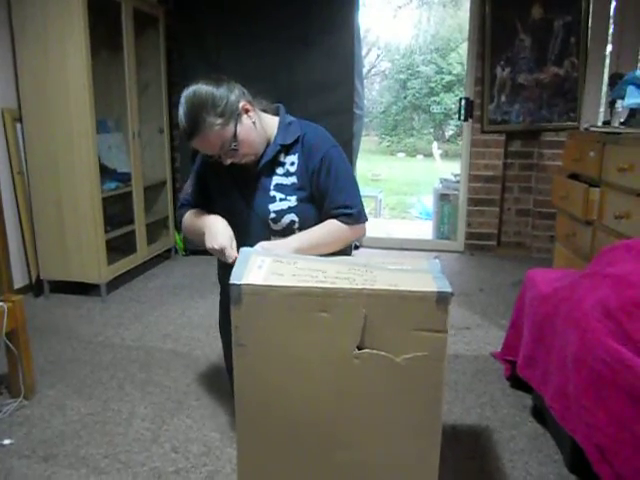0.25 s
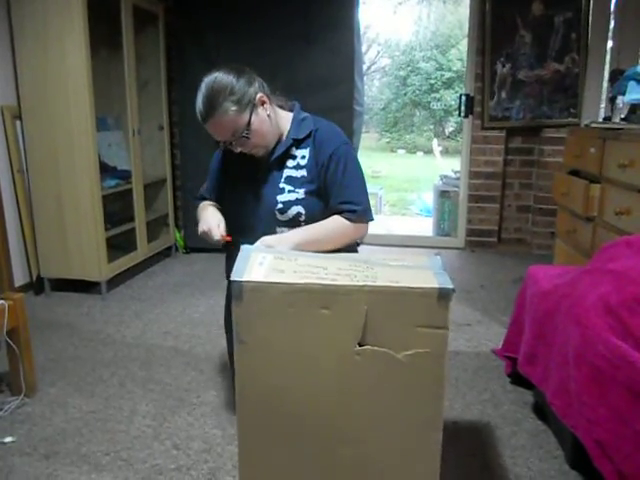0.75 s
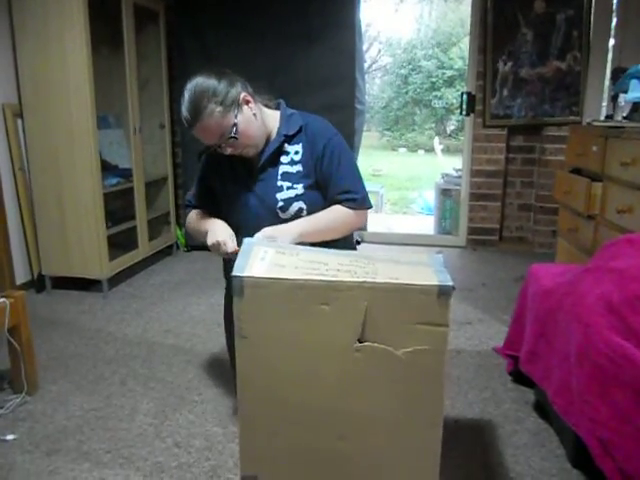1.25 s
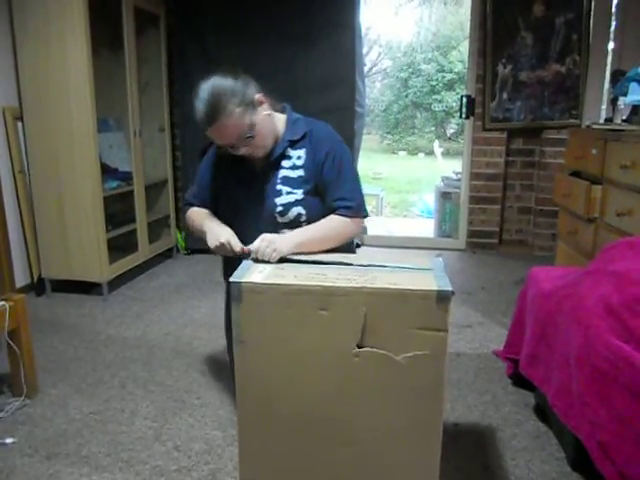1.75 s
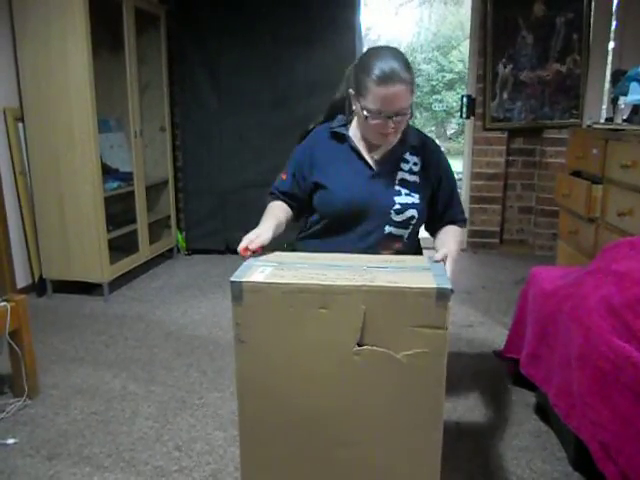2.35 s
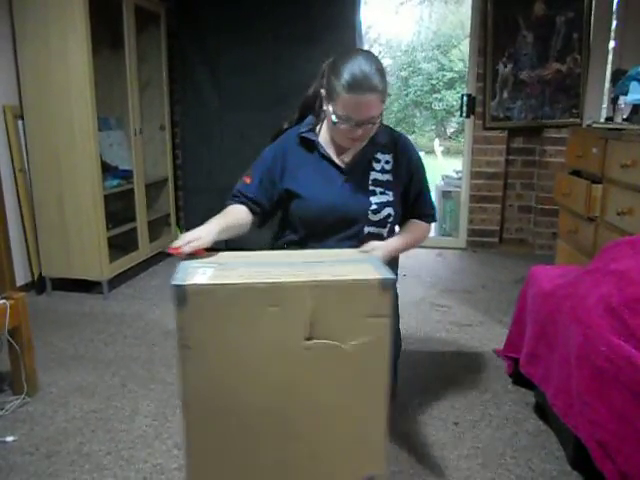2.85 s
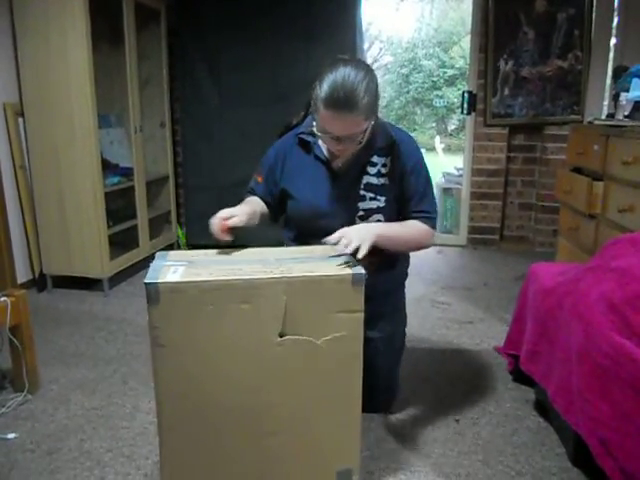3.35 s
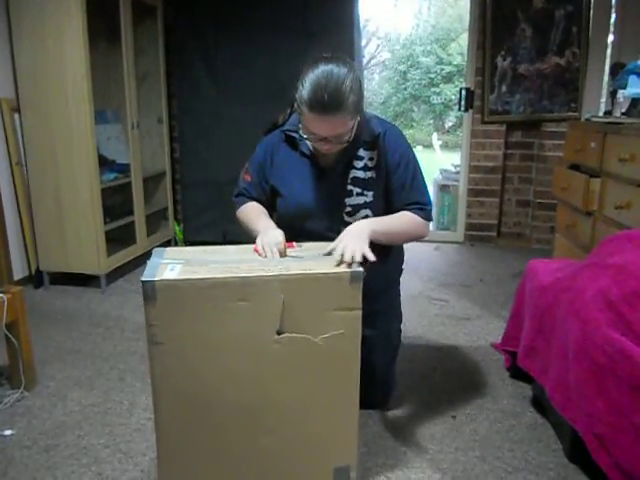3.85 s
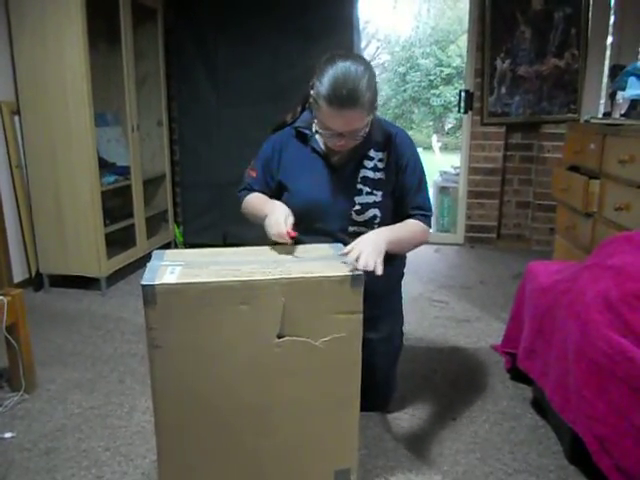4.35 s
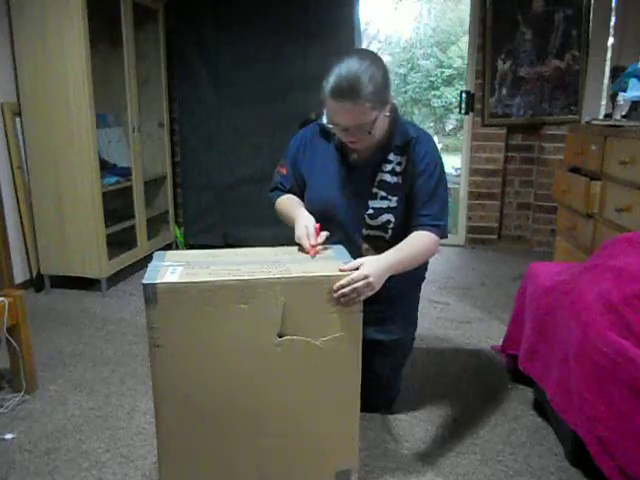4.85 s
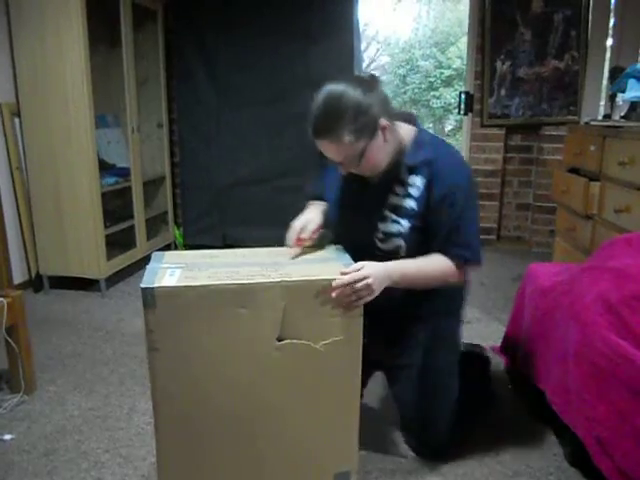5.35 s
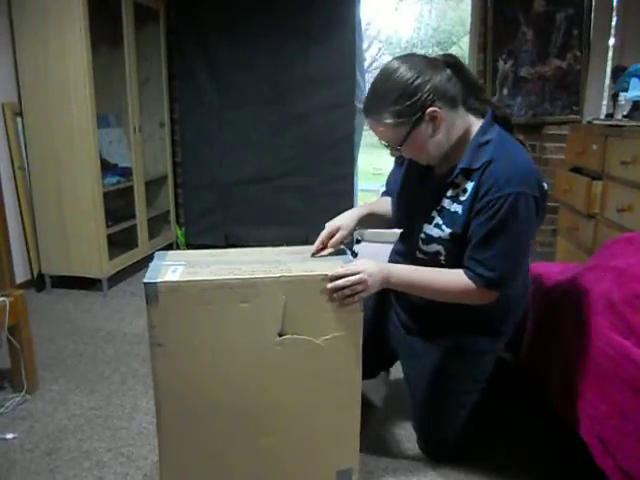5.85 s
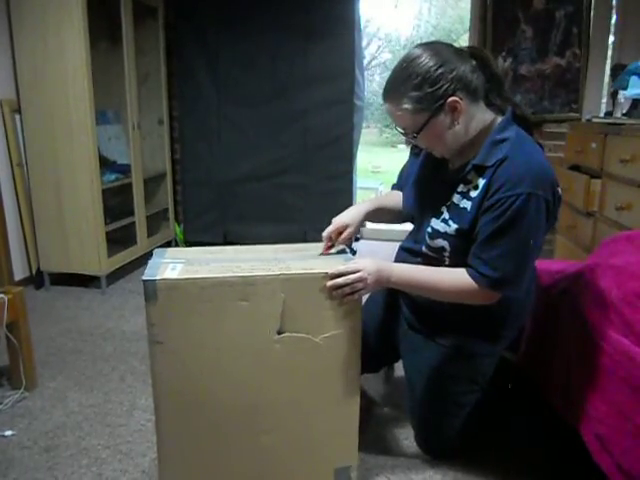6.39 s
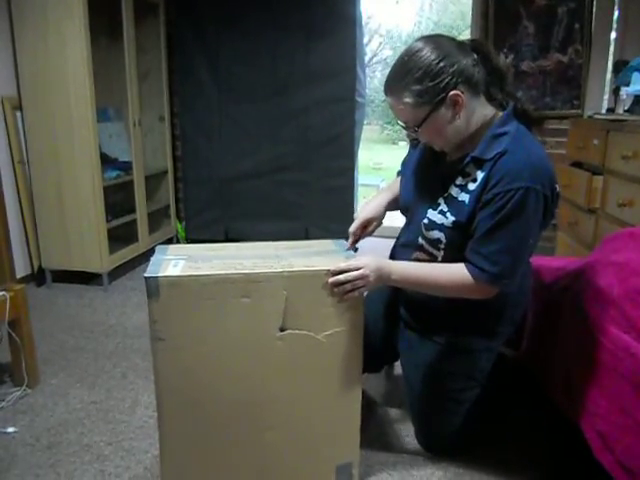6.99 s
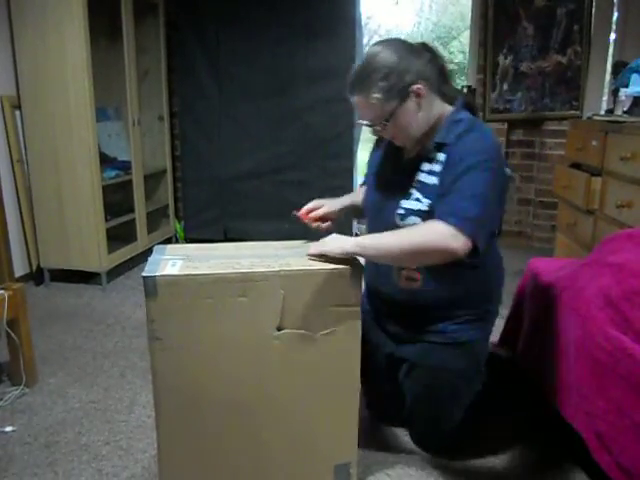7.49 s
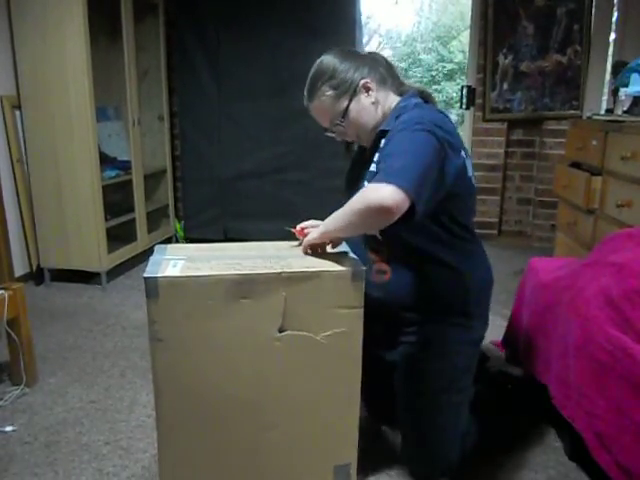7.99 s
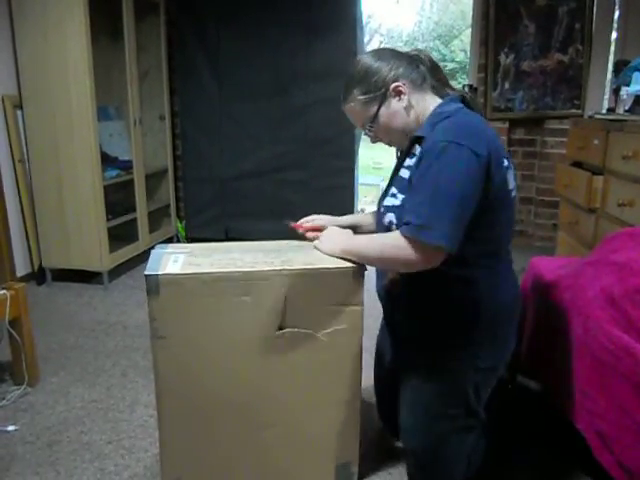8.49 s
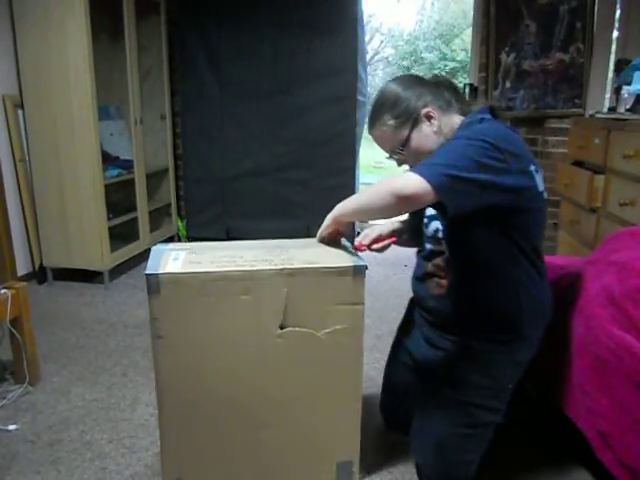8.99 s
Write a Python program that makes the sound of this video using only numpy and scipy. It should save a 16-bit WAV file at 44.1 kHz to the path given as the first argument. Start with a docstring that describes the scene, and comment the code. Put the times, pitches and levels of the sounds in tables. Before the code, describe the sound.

Rough cutting strokes, crisp tape snaps and dull hollow box thumps over faint room hum, with a loud clipped punch near the end.

```python
"""A blade rasps and snaps through packing tape on a big hollow cardboard box in a carpeted room; hands
slide and knock on the box over faint hum, and near the end a hard stab overloads the microphone.
Strokes are rough noise split into hiss, rasp and rumble; snaps and creaks are filtered noise bursts;
knocks and the stab are decaying sines with noisy crunch. A short room answer surrounds the work.
The microphone cuts the top octave, turns its gain down on overload, recovers and clips."""
import sys
import numpy as np
from scipy import signal
from scipy.fft import rfft, irfft, next_fast_len
from scipy.io import wavfile
from scipy.ndimage import map_coordinates

SR = 44100
rng = np.random.default_rng(int(sys.argv[2]) if len(sys.argv) > 2 else 0)


def dump(signal):
    """Clip the signal to [-1, 1] and save it as 16-bit WAV at the path in sys.argv[1]."""
    limited = np.clip(np.atleast_2d(signal).T, -1, 1)
    pcm = np.round(limited * 32767).astype(np.int16)
    wavfile.write(sys.argv[1], SR, pcm)


N = 407043
TIME = np.arange(N) / SR  # s, the whole scene
AGE = np.arange(SR // 3) / SR  # s since a blow or snap began


def amp(db):
    """Decibels to gain."""
    return 10 ** (np.asarray(db) / 20)


def unit(x):
    """Scale to rms 1."""
    return x / np.sqrt(np.mean(x ** 2) + 1e-20)


def crest(x):
    """Scale to peak 1."""
    return x / np.abs(x).max()


def along(points, hz):
    """Read (Hz, value) points on a log frequency axis."""
    f, v = np.transpose(points)
    return np.interp(np.log(hz + 1), np.log(f), v)


def fade(t60):
    """Exponential decay that loses 60 dB in t60 seconds."""
    return np.exp(-np.log(1000) * AGE / t60)


def wobble(rate):
    """A smooth random curve with rate knots a second."""
    knots = rng.standard_normal(int(N * rate / SR) + 4)
    return map_coordinates(knots, [TIME * rate])


def colour(x, gain_db):
    """Minimum-phase filter with the given dB response of frequency, so nothing rings ahead of a hit."""
    m = 2 * next_fast_len(len(x) // 2 + 4096)
    gain = amp(gain_db(np.fft.rfftfreq(m, 1 / SR)))
    cepstrum = irfft(np.log(gain + 1e-6))
    cepstrum[1:m // 2] *= 2  # fold the cepstrum to make the filter causal
    cepstrum[m // 2 + 1:] = 0
    response = np.exp(rfft(cepstrum))
    return irfft(rfft(x, m) * response)[:len(x)]


def shaped(x, points):
    """Filter x with a response given as (Hz, dB) points."""
    return colour(x, lambda hz: along(points, hz))


def bump(hz, centre, q):
    """dB response of one resonance."""
    detune = (hz + 1) / centre - centre / (hz + 1)
    return -10 * np.log10(1 + (q * detune) ** 2)


def add(track, s, sound):
    """Mix a sound in at time s."""
    part = track[round(s * SR):][:len(sound)]
    part += sound[:len(part)]


def background():
    """Room noise whose level drifts, with a faint wavering hum of sines that follows it."""
    # room noise spectrum: f/Hz, relative level/dB
    air_spectrum = [(15, -36), (25, -6), (79, -7.5), (145, -9.5), (221, -6), (264, -6), (292, -7),
                    (519, -11), (737, -12), (795, -13), (857, -13), (996, -12), (1190, -14.5),
                    (4830, -20.5), (10000, -23.5), (13000, -30.5), (22000, -120)]
    # hum partials: f/Hz, rms level/dB around which each wavers
    hum_partials = [(296, -49.5), (339, -61.5), (726.7, -57.5), (845.2, -59), (1184, -61), (7868, -63.5)]
    # drift of the background: t/s, level/dB (the noise sits 3 dB lower)
    room_level = [(0, -38), (0.9, -37.5), (2.0, -40), (3.4, -38), (4.3, -37.5), (8.2, -37.5), (9.2, -43)]
    air = unit(shaped(rng.standard_normal(N), air_spectrum))
    hum = np.zeros(N)
    for hz, db in hum_partials:
        level = amp(db + 0.567 * wobble(5.0)) * np.sqrt(2)
        hum += level * np.sin(2 * np.pi * hz * TIME + 0.626 * wobble(13))
    level_db = np.interp(TIME, *np.transpose(room_level))
    return amp(level_db - 3.0) * air + amp(level_db - level_db.mean()) * hum


def stroke_controls():
    """Strokes swell and die away; returns the gains of hiss, rasp and rumble, and the rasp's centre."""
    # strokes of blade or hand: t/s of greatest effort, rise/s, fall/s, level/dB before the contact's
    # own balance, contact
    stroke_rows = [ (0.225, 0.0205, 0.027, -28.5, "rub"), (0.36, 0.072, 0.11, -29.5, "dig"),
                   (0.465, 0.056, 0.072, -33, "dig"), (0.57, 0.084, 0.052, -45.5, "slit"),
                   (1.14, 0.014, 0.081, -27, "dig"), (1.27, .08, 0.085, -36.5, "dig"),
                   (1.371, 0.06, 0.0043, -29, "slit"), (1.625, 0.057, .09, -33, "dig"),
                   (1.872, 0.062, 0.014, -24, "dig"), (2.41, 0.066, 0.081, -43.5, "rub"),
                   (2.78, 0.285, 0.12, -39, "slit"), (2.835, 0.018, 0.013, -36.5, "saw"),
                   (3.07, 0.052, 0.14, -41.5, "saw"), (3.8, 0.078, .04, -33.5, "saw"),
                   (4.8, 0.11, 0.068, -38, "saw"), (4.968, 0.025, 0.054, -32, "scuff"),
                   (5.12, 0.138, .06, -46.5, "slit"), (5.19, 0.0314, .03, -38.5, "scuff"),
                   (5.31, 0.147, 0.112, -41, "slit"), (5.41, 0.067, 0.028, -42, "rub"),
                   (5.7, 0.4, 0.23, -45, "saw"), (6.5, 0.025, 0.052, -30, "dig"),
                   (6.58, 0.054, 0.048, -27.5, "saw"), (6.7, 0.098, 0.11, -34, "saw"),
                   (6.81, 0.23, .08, -36.5, "scuff"), (6.87, 0.037, 0.034, -42, "slit"),
                   (6.94, 0.16, 0.179, -32, "scuff"), (7.04, 0.079, 0.1, -37, "slit"),
                   (7.22, 0.18, 0.39, -47, "slit"), (7.355, 0.11, 0.11, -24.5, "slide"),
                   (7.659, 0.0167, 0.073, -34, "rub"), (7.735, .02, 0.076, -36, "rub"),
                   (7.87, 0.038, 0.037, -40.5, "rub"), (8.02, 0.076, 0.18, -40, "dig"),
                   (8.2, 0.28, 0.18, -39, "saw"), (9.22, 0.071, .05, -52, "saw")]
    # balance of each contact: tape hiss/dB, cardboard rasp/dB, panel rumble/dB (relative), rasp centre f/Hz
    # slit: the blade runs along the tape; saw: it works through cardboard;
    # scuff: its flat scrapes a flap; dig: it bears down and shakes the panel;
    # rub: a hand drags heavily on the box; slide: a palm glides over the lid
    contact_balance = { "slit": (4, -3.5, -0.5, 963), "saw": (-2.5, -1, -2.5, 1155),
                       "scuff": (-7, -1.5, -11.5, 1100), "dig": (-3.5, -7, 0, 933),
                       "rub": (-9, -4.5, 5.5, 1008.5), "slide": (-10, -2.5, -8, 770), }
    swell_db = 12.5  # gained over the rise and lost over the fall
    swell_shape = 1.29  # above 1 a stroke is round at its peak and ends cleanly
    t = np.linspace(0, TIME[-1], N // 40)
    power = []
    for s, rise, fall, db, _ in stroke_rows:
        distance = np.clip(np.maximum((s - t) / rise, (t - s) / fall), 0, 10)
        power.append(amp(db - swell_db * distance ** swell_shape) ** 2)
    power = np.array(power)
    contacts = np.array([contact_balance[row[-1]] for row in stroke_rows]).T
    gains = np.sqrt(amp(contacts[:-1]) ** 2 @ power)
    centre_hz = contacts[-1] @ power / power.sum(0)  # the stronger stroke decides
    return [np.interp(TIME, t, curve) for curve in (*gains, centre_hz)]


def fibres(rate, smooth):
    """Tiny breaks of uneven size, rate a second on average, over smooth friction noise."""
    breaks = (rng.random(N) < rate / SR) * rng.standard_normal(N)
    return unit(breaks) + smooth * rng.standard_normal(N)


def cardboard_rasp(centre_hz, q, blend_octaves):
    """Tearing fibres through a resonance that glides by blending three fixed ones."""
    # rasp spectrum: f/Hz, relative level/dB
    rasp_spectrum = [(300, -21), (520, -1), (750, -3), (1450, -3.5), (1900, -12), (3500, -22)]
    fixed_hz = np.array([740, 1080, 1430])
    shares = np.exp(-(np.log2(centre_hz / fixed_hz[:, None]) / blend_octaves) ** 2)
    voices = []
    for c in fixed_hz:
        torn = fibres(rate=500, smooth=1.0)
        voices.append(unit(colour(torn, lambda hz: along(rasp_spectrum, hz) + bump(hz, c, q))))
    return (shares * voices).sum(0) / np.linalg.norm(shares, axis=0)


def box_ring(struck_hz, q):
    """The box's modes at new strengths; those near the struck panel's pitch answer most."""
    # modes of the hollow box: f/Hz, relative level/dB, t60/s
    box_modes = [(136.3, 1.5, 0.053), (186.5, -9.5, 0.27), (257.8, -2, 0.181), (294.5, -7.5, 0.048),
                 (351.5, -17.5, 0.075), (400.6, 4, 0.035), (467, -19.5, 0.1), (673, -24, 0.076),
                 (731, -5, 0.14), (797, -7, 0.18), (1145, -41, 0.1), (1390.5, -4, 0.0274)]
    ring = np.zeros(len(AGE))
    for hz, db, t60 in box_modes:
        strength = amp(db + bump(hz, struck_hz, q) + rng.normal(0, 2.7))
        ring += strength * fade(t60) * np.sin(2 * np.pi * (hz * AGE + rng.random()))
    return ring


def strokes():
    """Blade and hands drag unevenly: tape hisses, cardboard rasps and the panels rumble."""
    # tape hiss spectrum: f/Hz, relative level/dB
    hiss_spectrum = [(900, -26), (1900, -2.5), (2900, 0.5), (3400, -0.5), (4300, 1.5), (5500, -0.5),
                     (6500, -2), (7700, -3), (9000, -1.5), (11000, -8)]
    # panel rumble spectrum: f/Hz, relative level/dB
    rumble_spectrum = [(40, -6.5), (100, -13.5), (180, -17.5), (330, 10.5), (450, 6), (800, -30.5)]
    hiss_gain, rasp_gain, rumble_gain, centre_hz = stroke_controls()
    grip = amp(0.42 * wobble(60) + 2.1 * wobble(260))  # the edge catches and lets go
    hiss = hiss_gain * unit(shaped(fibres(rate=700, smooth=1.0), hiss_spectrum))
    rasp = rasp_gain * cardboard_rasp(centre_hz, q=1.235, blend_octaves=0.457)
    drag = fibres(rate=260, smooth=0.81)
    hollow = unit(signal.fftconvolve(drag, box_ring(370, q=0.35))[:N])
    panels = unit(shaped(drag, rumble_spectrum)) + 0.97 * hollow
    rumble = rumble_gain * unit(panels)
    return amp(-2.0) * grip * (hiss + rasp + rumble)


def snap(centre_hz, t60, q):
    """A burst of tearing, coloured by the taut tape or card around it."""
    burst = rng.standard_normal(len(AGE)) * (fade(t60) + 0.029 * fade(0.071))
    return crest(colour(burst, lambda hz: bump(hz, centre_hz, q) + bump(hz, centre_hz, q=0.425)))


def snaps():
    """The tape snaps, or zips when it tears for longer, and the stab cracks at 8.25 s, each time jolting the
    card under it."""
    # tears of the tape, and the crack as the blade stabs the lid at 8.25 s: t/s, peak level/dB without the
    # jolt, centre f/Hz, sharpness Q, t60/s
    bursts = [(0.2028, -22.5, 1500, 0.74, 0.085), (0.227, -23, 2500, 1.4, 0.021),
              (0.3785, -10, 4170, 3, 0.0117), (1.0036, -21.5, 2140, 3.7, 0.0076),
              (1.129, -11.5, 3480, 0.63, .036), (1.258, -17.5, 4930, 1.5, 0.027),
              (1.373, -4.5, 9100, 2.05, .004), (1.692, -22.5, 5000, 1.2, 0.017),
              (1.806, -21.5, 3000, 0.38, 0.012), (1.866, -18, 6000, .5, 0.028),
              (2.259, -24.5, 5000, 0.86, 0.037), (2.297, -13.5, 2590, 2.2, 0.0071),
              (2.3411, -20.5, 6350, 4.6, 0.03), (2.7706, -22, 5000, 0.72, 0.036),
              (3.646, -19.5, 9100, 3.16, 0.0098), (3.715, -27, 1400, 0.41, 0.022),
              (3.7846, -10.5, 4400, 0.71, 0.0072), (3.8238, -10, 3020, 1.3, 0.016),
              (3.825, -14, 1450, 1.5, 0.028), (5.38, -22.5, 4000, 0.42, 0.012),
              (5.456, -32, 1300, 0.55, 0.0206), (5.5968, -24.5, 3720, 1.5, 0.021),
              (5.887, -19, 4330, 2.9, 0.017), (6.033, -14.5, 3050, 5.4, .011),
              (6.0334, -6.5, 4180, 2.62, 0.0078), (6.3245, -15, 2940, 1.7, 0.021),
              (6.325, -15.5, 5500, 2.5, 0.019), (6.328, -7.5, 8100, 0.59, 0.0126),
              (6.43, -23, 5000, 0.49, .008), (6.477, -11.5, 5160, 2.2, 0.038), (6.482, -9, 5500, 0.34, .025),
              (6.49, -24, 8500, 1.86, 0.48), (6.566, -22, 6980, 4.8, 0.178),
              (6.699, -28.5, 6520, 6.2, 0.125), (7.0797, -5.5, 8550, 0.57, 0.02),
              (7.5622, -25, 4360, 1.2, .008), (8.2499, 4.5, 7040, 0.6, 0.0053), (8.254, -8, 8400, 4.8, .014),
              (8.941, -32.5, 4000, 0.54, .025)]
    out = np.zeros(N)
    for s, db, centre_hz, q, t60 in bursts:
        jolt = snap(1188, 0.0051, q=3.3) * min(1, 3000 / centre_hz)
        add(out, s, amp(db) * snap(centre_hz, t60, q) + amp(db - 10.5) * jolt)
    return out


def knock(panel_hz, crunch_db):
    """The struck panel swings a few times, its flutes crunch, and the whole box rings on."""
    # crunch spectrum: f/Hz, relative level/dB
    crunch_spectrum = [(50, -21), (200, 0.5), (750, -4), (1400, 1), (2000, -14.5), (5000, -4.5),
                       (11000, -58)]
    swing = np.sin(2 * np.pi * panel_hz * AGE) * fade(8.2 / panel_hz)
    swing = crest(colour(swing, lambda hz: bump(hz, panel_hz, q=1.315)))  # it takes a cycle to get moving
    flutes = rng.standard_normal(len(AGE)) * fade(0.0614)
    crunch = crest(colour(flutes, lambda hz: along(crunch_spectrum, hz) + bump(hz, 0.98 * panel_hz, q=0.28)))
    ring = crest(box_ring(panel_hz, q=0.72)) * (1 - np.exp(-AGE / 0.002))  # soft onset
    return crest(swing + amp(crunch_db + 4.5) * crunch + amp(-9.0) * ring)


def knocks():
    """Blows on the box; some are followed by weaker repeats 21 ms apart, like echoes from a near surface."""
    # blows: t/s, peak level/dB, pitch f/Hz of the struck panel, crunch/dB (raised 4.5 dB in the knock),
    # number of repeats
    blows = [(0.226, -16.5, 244.7, -6, 0), (0.349, -19, 187.3, -8, 1), (1.001, -23.5, 300, -1, 0),
             (1.129, -9, 307, -5.5, 1), (1.133, -28, 74.4, -12.5, 0), (1.138, -15, 168.1, -7, 0),
             (1.148, -14.5, 630, -17.5, 0), (1.51, -27, 286, -8, 1), (1.832, -18, 385, -9, 2),
             (2.26, -24, 298, -7, 0), (2.291, -12, 730, -19, 1), (2.291, -10.5, 193, -18, 1),
             (2.294, -11.5, 380, -33, 0), (2.341, -16, 241.6, -9, 0), (2.777, -30, 124, -10, 0),
             (2.892, -26.5, 134, 3, 0), (3.6, -27, 326, -8, 0), (3.715, -18.5, 390, -9.5, 1),
             (3.824, -18.5, 410, -9.5, 0), (4.626, -22.5, 329, -9, 0), (4.742, -23, 291.4, -20, 1),
             (5.456, -19.5, 361.5, -8, 0), (5.597, -16.5, 366, -12.5, 1), (5.887, -20.5, 330, -16, 0),
             (6.034, -26.5, 303.6, -8, 0), (6.325, -10.5, 314.7, -10, 0), (6.333, -21.5, 145.2, -10, 0),
             (6.475, -11, 228, -8, 0), (7.331, -15.5, 740, -16.5, 0), (7.633, -24, 330, -5, 0),
             (7.718, -18, 258, -9, 1), (7.79, -20, 219.5, -7.5, 0), (8.695, -29, 330, 11, 0)]
    repeat_s, repeat_loss_db = .021, 8.5
    out = np.zeros(N)
    for s, db, panel_hz, crunch_db, repeats in blows:
        for k in range(1 + round(repeats)):
            hit = amp(db - k * repeat_loss_db) * knock(panel_hz, crunch_db)
            add(out, s + k * repeat_s, hit)
    return out


def creaks():
    """The cardboard creaks in short runs of slips, each slip a sharply tuned burst."""
    # runs of slips: start t/s, length/s, slips per s, level/dB (each slip peaks 1.5 dB higher), centre f/Hz
    slip_runs = [(7.6375, .035, 110, -26.5, 2830), (7.717, .014, 105, -27, 2500)]
    out = np.zeros(N)
    for start, length, rate, db, centre_hz in slip_runs:
        for s in np.arange(start, start + length, 1 / rate):
            slip = amp(db + 1.5) * snap(centre_hz, 0.0053, q=8.4)
            add(out, s + rng.normal(0, 0.0015), slip)
    return out


def stab():
    """The blade punches through the lid, which gives way at once and rings briefly, its flutes crunching."""
    # modes of the punctured lid: f/Hz, level/dB before the bass cut, t60/s
    lid_modes = [(286, -8, 0.079), (453.6, -1, 0.025), (554, -13, .03), (1030, -1, 0.016),
                 (1376, 1.5, 0.016)]
    stab_s, stab_db = 8.2503, -4  # time, gain
    ring = sum(amp(db) * fade(t60) * np.sin(2 * np.pi * hz * AGE) for hz, db, t60 in lid_modes)
    ring = shaped(ring, [(100, -13.5), (280, 1)])
    flutes = snap(centre_hz=1100, t60=.03, q=0.35)
    out = np.zeros(N)
    add(out, stab_s, amp(stab_db) * (ring + amp(-2) * flutes))
    return out


def room(x, tail_db, wall_db, wall_s):
    """A dull echo from one wall and a short diffuse tail whose treble dies first."""
    # decay of the tail: f/Hz, t60/s
    room_t60 = [(150, 0.337), (1000, 0.3), (4000, 0.2), (10000, 0.18)]
    hz, t, z = signal.stft(rng.standard_normal(SR // 2), SR, nperseg=256)
    decay = np.exp(-np.log(1000) * t / along(room_t60, hz)[:, None])
    tail = signal.istft(z * decay, SR, nperseg=256)[1]
    wall = shaped(signal.unit_impulse(len(AGE)), [(400, 2.0), (1400, -5.5), (4000, -36)])
    answer = np.zeros(SR)
    add(answer, .005, amp(tail_db) * tail / np.linalg.norm(tail))
    add(answer, wall_s, amp(wall_db) * wall)
    return x + signal.fftconvolve(x, answer)[:N]


def scene():
    """Work on the box, heard in the room over its background."""
    work = strokes() + snaps() + knocks() + creaks() + stab()
    return (room(work, tail_db=-7.0, wall_db=-15.5, wall_s=.0205) + background())[None]


def gain_control(x, duck_db, hold_s, smooth_s, recover_db_per_s):
    """An overload turns the gain down; it is held, then creeps back."""
    overload = np.abs(x) > .85
    last_overload = np.maximum.accumulate(np.where(overload, TIME, -np.inf))
    since = TIME - last_overload
    depth_db = np.clip(duck_db - recover_db_per_s * np.maximum(since - hold_s, 0), 0, None)
    pole = np.exp(-1 / (smooth_s * SR))
    return x * amp(-signal.lfilter([1 - pole], [1, -pole], depth_db))


def record(dry):
    """A microphone with little treble above 10 kHz and gain control, clipping at 0.8 of full scale."""
    # microphone response: f/Hz, gain/dB
    mic_response = [(10000, 0), (10500, -4), (11000, -13.5), (12000, -15.5), (12700, -67)]
    x = shaped(dry[0], mic_response)
    x = gain_control(x, duck_db=10.0, hold_s=0.6, smooth_s=0.023, recover_db_per_s=24)
    x = np.clip(x, -.8, .8)
    passband = np.fft.rfftfreq(N, 1 / SR) < 16500  # Hz, trims the products of clipping
    return irfft(rfft(x) * passband, N)[None]


dry = scene()
out = record(dry)
dump(out)
```